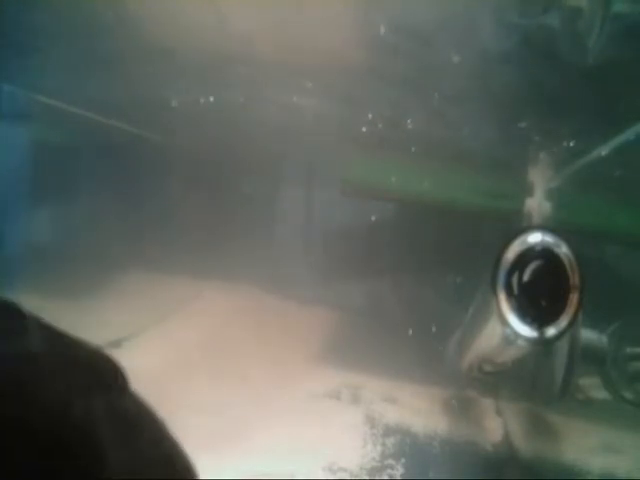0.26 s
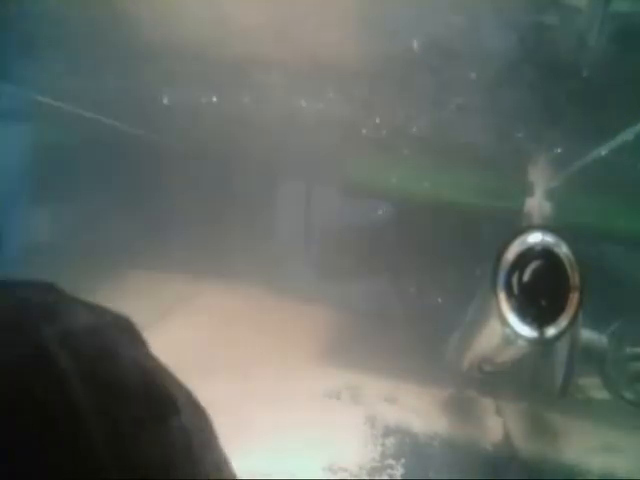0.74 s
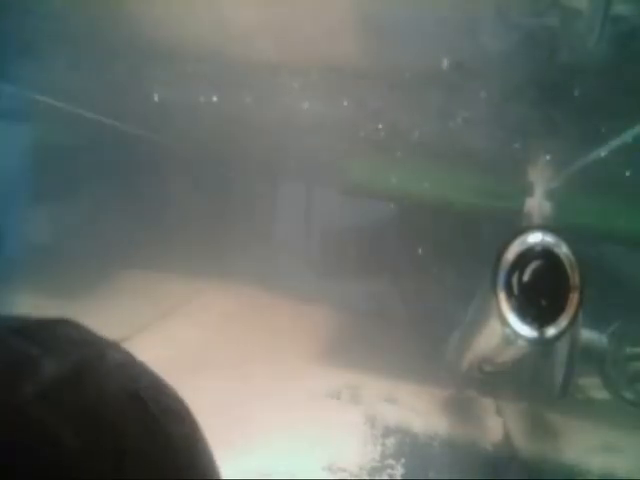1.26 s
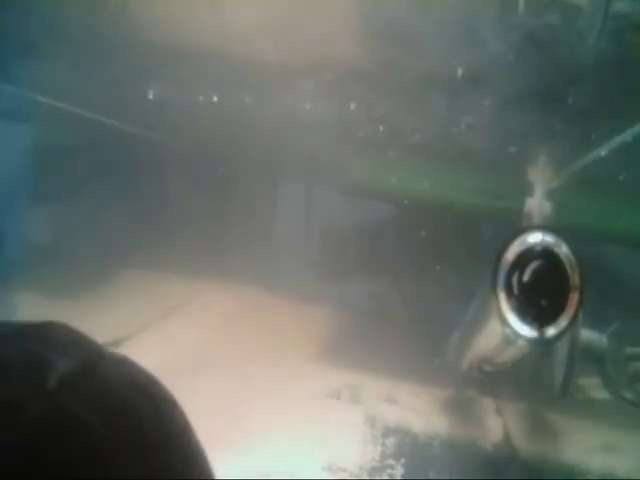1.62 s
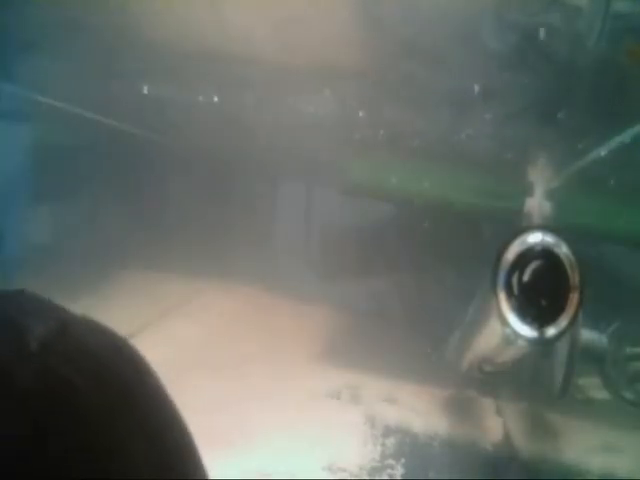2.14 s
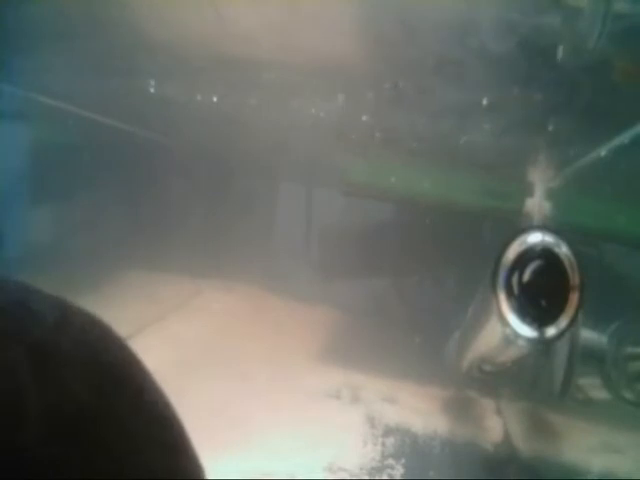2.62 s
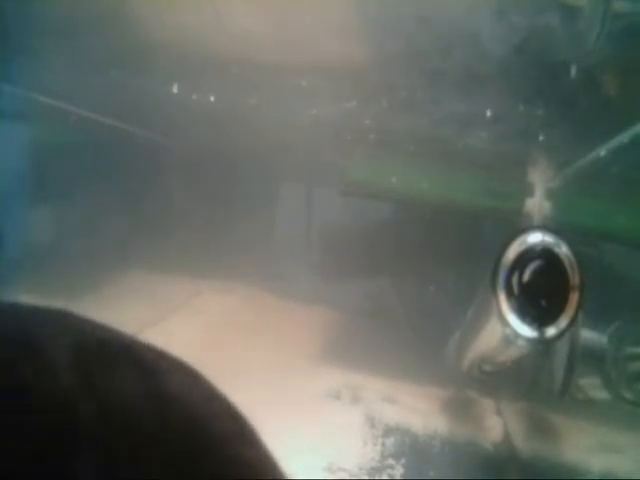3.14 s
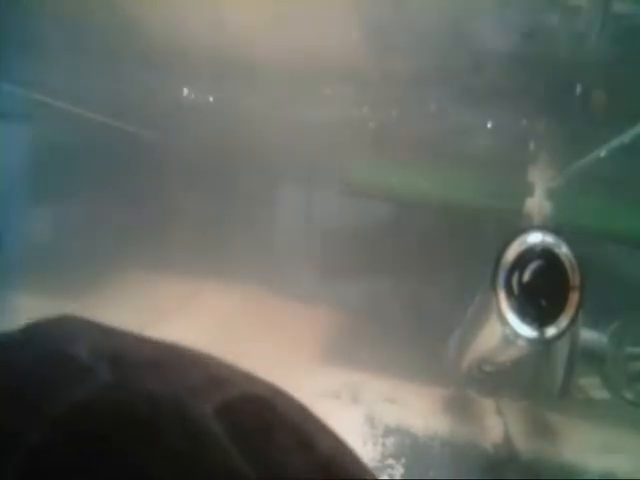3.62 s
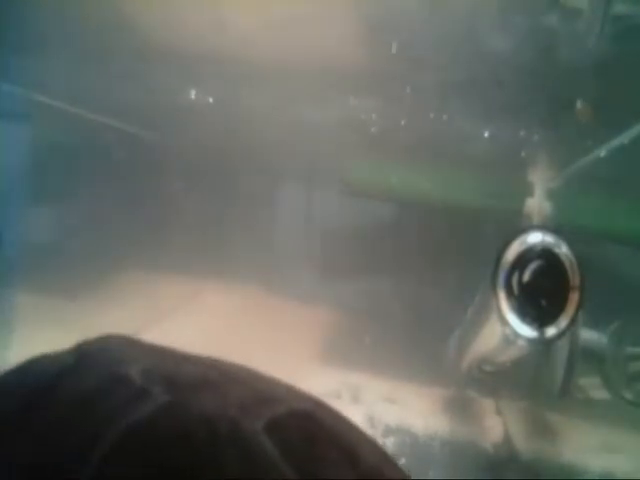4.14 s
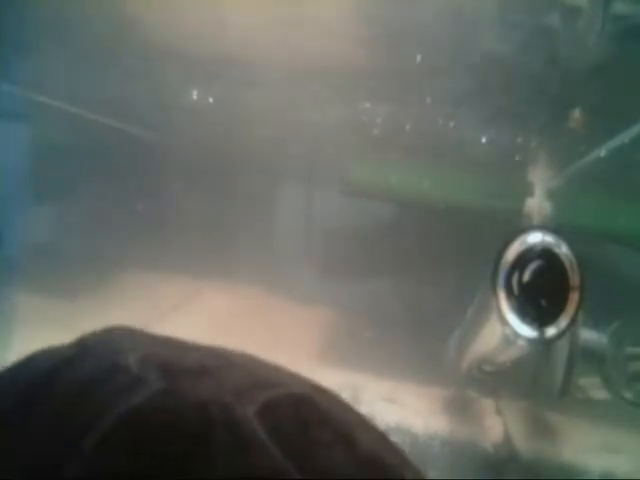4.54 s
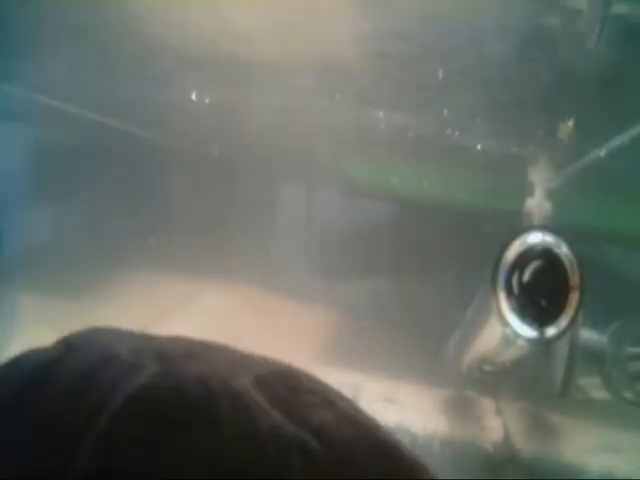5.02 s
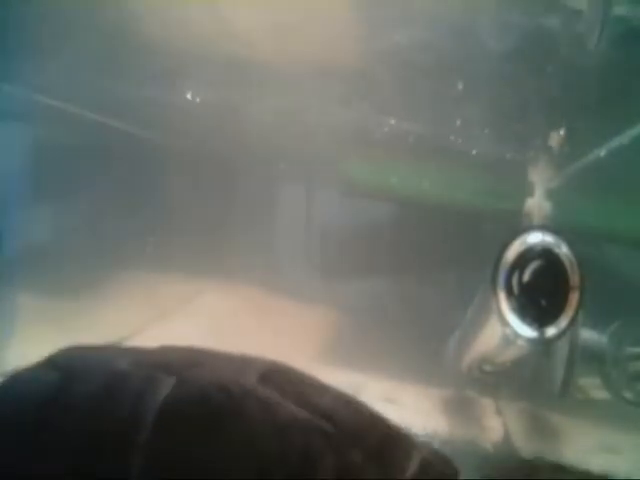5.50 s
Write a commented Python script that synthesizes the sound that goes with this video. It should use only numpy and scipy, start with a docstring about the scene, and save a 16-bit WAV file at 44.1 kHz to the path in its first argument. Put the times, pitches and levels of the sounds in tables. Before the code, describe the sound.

Heard underwater in a turtle tank, a filter pump runs without a break: a low, raspy electric buzz with a quick, regular throb. Soft water churning and faint hiss lie beneath. Just before one second a tiny hard tick lands on the housing; around four seconds a dull bump follows a barely audible one. The small camera microphone sounds coarse, with a thin metallic treble edge.

```python
"""A filter pump runs in a turtle tank, heard from a small camera under the water.
From the start its drive buzzes in sharp spikes of alternating sign, a little slower than the mains hum,
so the two beat; the rotor adds a low tone, and filtered noise makes soft churning water and hiss.
At 0.9 s something, perhaps the turtle's shell, ticks on the housing; at 3.6 and 4.2 s it bumps softly.
The camera samples coarsely and holds each value, which mirrors every sound into the treble."""
import sys
import numpy as np
from scipy import signal
from scipy.fft import rfft, irfft, next_fast_len
from scipy.io import wavfile
from scipy.ndimage import map_coordinates

SR = 44100
rng = np.random.default_rng(int(sys.argv[2]) if len(sys.argv) > 2 else 0)


def dump(signal):
    """Clip the signal to [-1, 1] and save it as 16-bit WAV at the path in sys.argv[1]."""
    limited = np.clip(np.atleast_2d(signal).T, -1, 1)
    pcm = np.round(limited * 32767).astype(np.int16)
    wavfile.write(sys.argv[1], SR, pcm)


N = 254456

PUMP_HZ, MAINS_HZ = 48.3537, 49.983
# First switch of each polarity, and first crest of the mains.
FIRST_DOWN_S, FIRST_UP_S, MAINS_CREST_S = 0.00856, 0.01799, 0.01087

# Colour of the drive spikes. Each row: frequency in Hz, gain in dB.
SPIKE_COLOUR = [(100, -1), (500, 0.5), (1100, 0), (2000, 0), (3200, 0), (4600, -0.5)]
# Mains hum. Each row: multiple of the mains frequency, rms level in dB.
MAINS_HARMONICS = [(1, -80), (2, -69), (3, -54), (4, -63), (5, -73.5), (6, -75), (8, -75), (9, -66.5)]
# Faint steady drones under the hum. Each row: frequency in Hz, rms level in dB.
FAINT_DRONES = [(30, -66), (60, -75), (90, -79)]
# Churning water. Each row: frequency in Hz, density in dB per Hz.
WATER_DENSITY = [(20, -96), (35, -85), (75, -89), (120, -88), (165, -93), (205, -86.5), (280, -90),
                 (330, -101), (400, -89), (460, -83), (530, -89.5), (600, -99), (900, -120)]
# Microphone hiss. Each row: frequency in Hz, density in dB per Hz.
HISS_DENSITY = [(100, -99), (800, -99), (1600, -101.5), (3000, -102.5), (5000, -104)]
# Hard contacts. Each row: time in seconds, strength in dB.
HARD_CONTACTS = [(.9038, -27)]
# Housing modes rung by a hard contact. Each row: frequency in Hz, level in dB, t60 in seconds.
HARD_MODES = [(467, -5, 0.021), (1000, -10, 0.015), (1395, -11, 0.06), (1930, -12.5, 0.017),
              (2335, -0.5, 0.012), (2680, -17, 0.021), (3010, -21, 0.026), (4360, -13, 0.0093)]
# Soft contacts. Each row: time in seconds, strength in dB.
SOFT_CONTACTS = [(3.585, -33), (4.1858, -17.5)]
# Housing modes rung by a soft contact. Each row: frequency in Hz, level in dB, t60 in seconds.
SOFT_MODES = [(120, -16.5, 0.1), (230, -9.5, 0.052), (457, -6, 0.042), (502, -7, 0.046)]


def amp(db):
    """Decibels to gain."""
    return 10 ** (np.asarray(db) / 20)


def along(points, hz):
    """Values at hz from (Hz, value) points, interpolated on a log axis."""
    point_hz, values = np.transpose(points)
    return np.interp(np.log(hz + 1), np.log(point_hz + 1), values)


def wobble(knots_per_s):
    """A smooth random curve through normally distributed knots."""
    knots = rng.standard_normal(int(N * knots_per_s / SR) + 4)
    return map_coordinates(knots, [np.arange(N) * knots_per_s / SR])


def filtered(x, response):
    """x times a response of frequency, zero-padded against wrap-around."""
    size = next_fast_len(N + 8192)
    spectrum = rfft(x, size) * response(np.fft.rfftfreq(size, 1 / SR))
    return irfft(spectrum, size)[:N]


def noise(density):
    """Gaussian noise with the given (Hz, dB per Hz) density."""
    white = rng.standard_normal(N) * np.sqrt(SR / 2)  # 0 dB per Hz
    return filtered(white, lambda hz: amp(along(density, hz)))


def tone(hz, rms_db, crest_s):
    """A steady sine that crests at the given time."""
    since_crest_s = np.arange(N) / SR - crest_s
    return np.sqrt(2) * amp(rms_db) * np.cos(2 * np.pi * hz * since_crest_s)


def impulses(times_s, sizes):
    """Impulses, each shared between its two nearest samples."""
    at = np.clip(times_s * SR, 0, None)
    i = at.astype(int)
    before = np.bincount(i, sizes * (1 - at + i), N)[:N]
    after = np.bincount(i + 1, sizes * (at - i), N)[:N]
    return before + after


def buzz():
    """The pump's drive switches twice a turn; each switch is a sharp step that leaks away."""
    level_db, scatter_db, leak_s = -34.5, 0.41, 0.00094
    twin_gain, twin_lag_s = 0.18, 0.000864
    early_s, drift_s = 0.00016, 0.00007

    n = np.arange(2 * int(N / SR * PUMP_HZ + 1))
    upward = n % 2 == 1
    sign = np.where(upward, 1, -1)
    times_s = np.where(upward, FIRST_UP_S, FIRST_DOWN_S) + n // 2 / PUMP_HZ
    drift = np.interp(times_s * SR, np.arange(N), wobble(1.486))
    # Every third switch comes early, which puts weak lines between the harmonics.
    times_s = times_s - early_s * (n % 3 == 0) + drift_s * drift
    sizes = sign * amp(level_db + scatter_db * rng.standard_normal(len(n)))

    # A weak twin follows each upward switch and leads each downward one.
    twins = twin_gain * impulses(times_s + sign * twin_lag_s, sizes)
    kicks = impulses(times_s, sizes) + twins
    spikes = signal.lfilter([1], [1, -np.exp(-1 / (SR * leak_s))], kicks)
    return filtered(spikes, lambda hz: amp(along(SPIKE_COLOUR, hz)))


def rotor():
    """The turning rotor shakes the water once a turn, cresting just before the upward switch."""
    lead_s = 0.0037
    return tone(PUMP_HZ, -60.0, FIRST_UP_S - lead_s)


def hum():
    """Mains harmonics and drones; the third beats with the pump's third about five times a second."""
    mains = sum(tone(round(k) * MAINS_HZ, rms_db, MAINS_CREST_S) for k, rms_db in MAINS_HARMONICS)
    drones = sum(tone(hz, rms_db, rng.random()) for hz, rms_db in FAINT_DRONES)
    return mains + drones


def water():
    """Soft churning: noise shaped to the water's density."""
    return noise(WATER_DENSITY)


def hiss():
    """Microphone hiss: noise falling gently toward the treble."""
    return noise(HISS_DENSITY)


def contacts(events, modes, attack_s):
    """Each contact rings decaying modes of the housing; a longer attack sets in more slowly."""
    t = np.arange(SR // 4) / SR
    ring = sum(amp(db - 60 * t / t60_s) * np.sin(2 * np.pi * hz * t) for hz, db, t60_s in modes)
    onset = 1 - np.exp(-t / attack_s)
    times_s, strengths_db = np.transpose(events)
    return signal.fftconvolve(impulses(times_s, amp(strengths_db)), -ring * onset)[:N]


def ticks():
    """Each hard contact touches three times: a weaker graze, the blow and one bounce."""
    touches = [(-0.00039, 7), (0, 0), (0.00265, 13)]  # lag in seconds, loss in dB
    events = [(s + lag_s, db - loss_db) for s, db in HARD_CONTACTS for lag_s, loss_db in touches]
    return contacts(events, HARD_MODES, attack_s=0.00042)


def knocks():
    """Soft contacts set in slowly and ring the lower modes of the housing."""
    return contacts(SOFT_CONTACTS, SOFT_MODES, attack_s=0.0062)


def scene():
    """Pump, hum, water and hiss, with a few touches on the housing."""
    steady = buzz() + rotor() + hum() + water() + hiss()
    return (steady + ticks() + knocks())[None]


def record(dry):
    """The camera samples at a quarter of the rate, holds each value, cuts the top and adds an offset."""
    hold_samples, offset = 4, 0.0071
    lowpass_hz, top_hz = 5300, 15900
    smooth = filtered(dry[0], lambda hz: 1 / np.sqrt(1 + (hz / lowpass_hz) ** 20))
    stepped = np.repeat(smooth[::hold_samples], hold_samples)[:N]
    return offset + filtered(stepped, lambda hz: hz < top_hz)[None]


dry = scene()
out = record(dry)
dump(out)
```